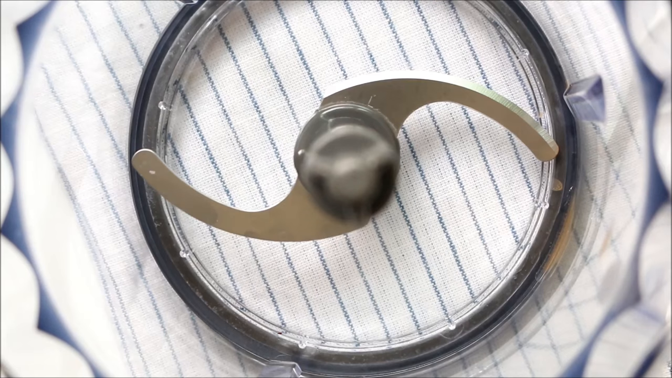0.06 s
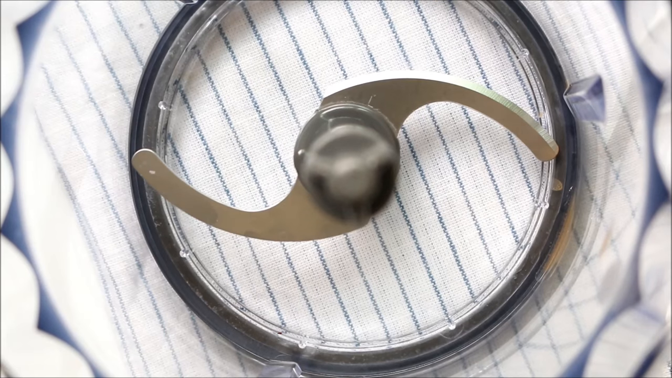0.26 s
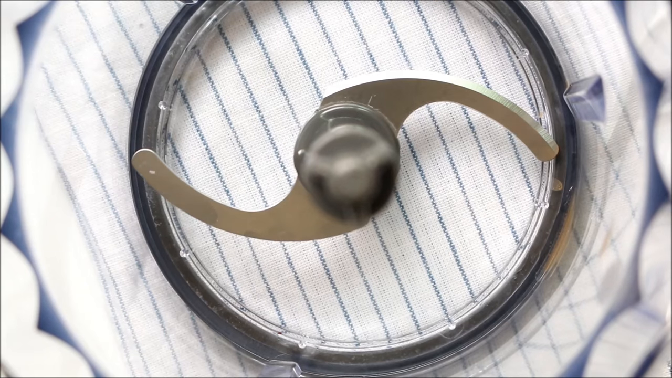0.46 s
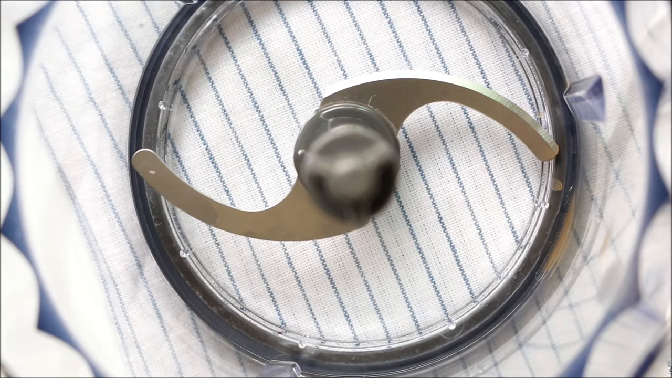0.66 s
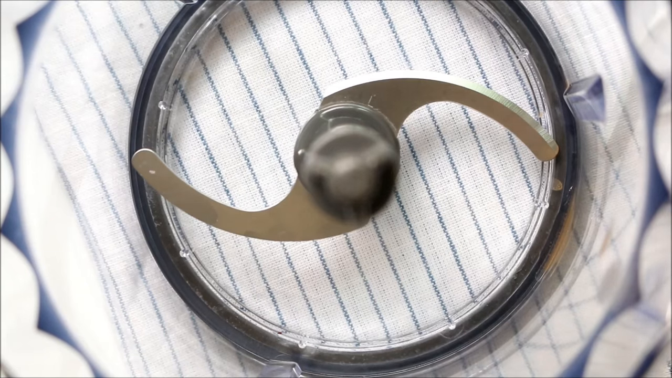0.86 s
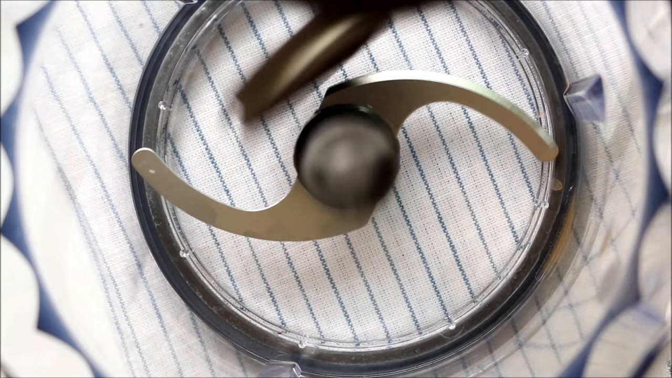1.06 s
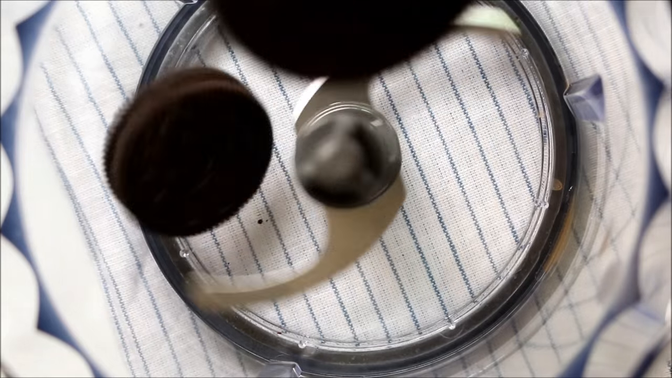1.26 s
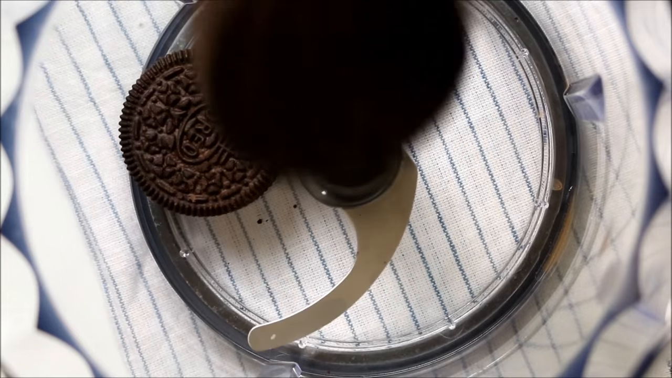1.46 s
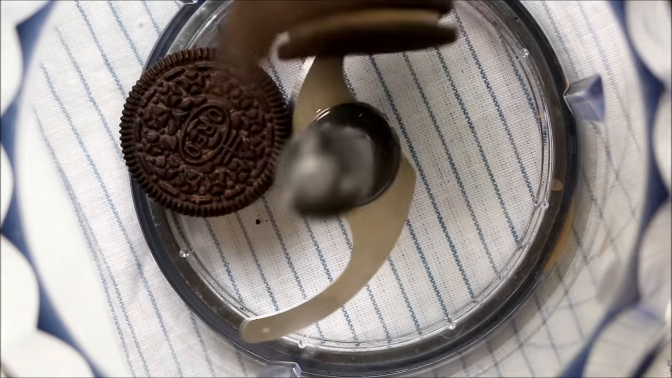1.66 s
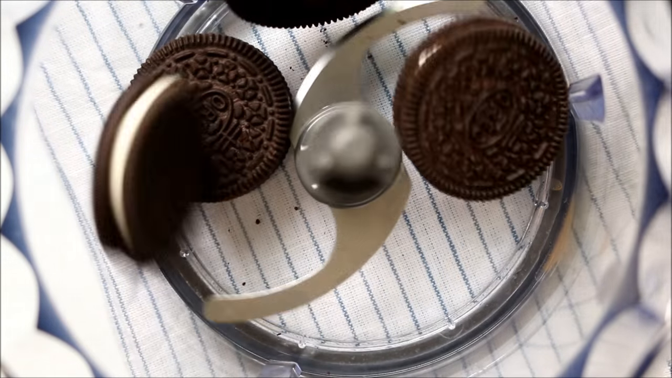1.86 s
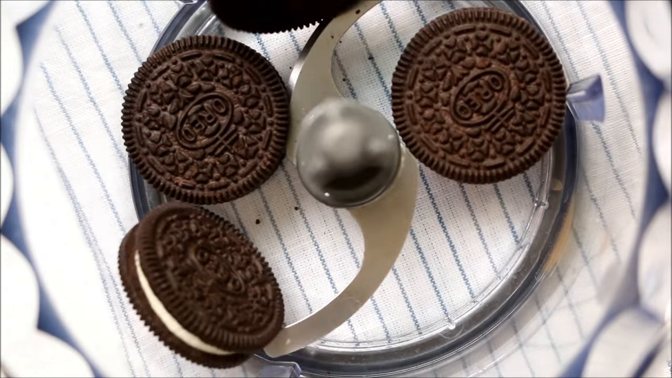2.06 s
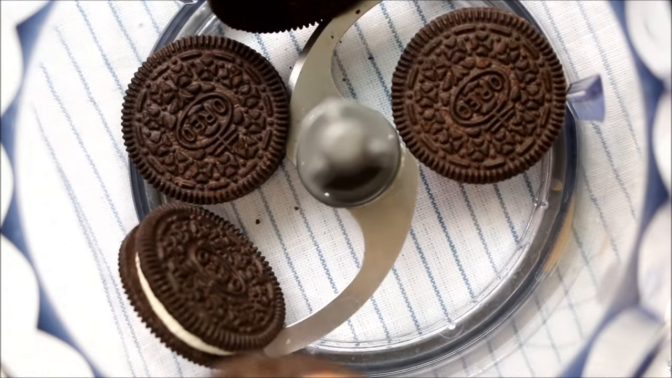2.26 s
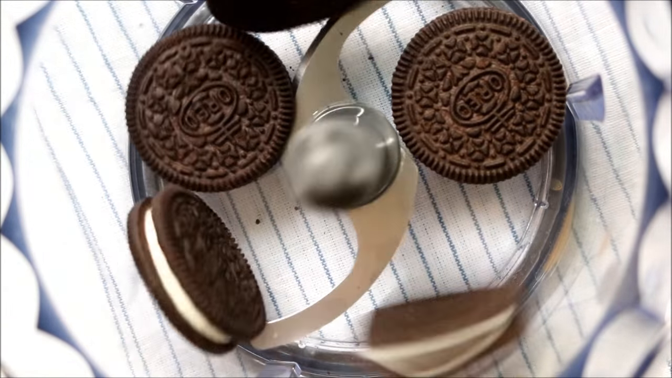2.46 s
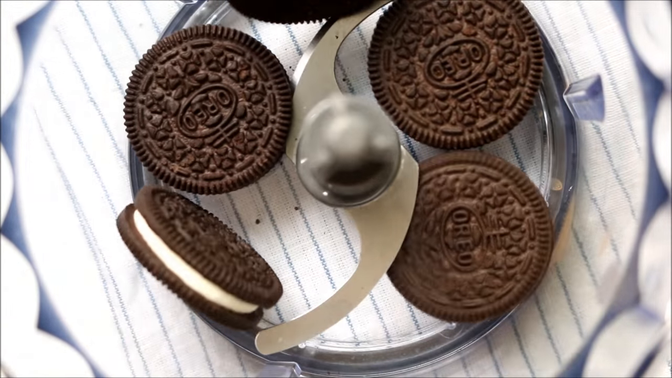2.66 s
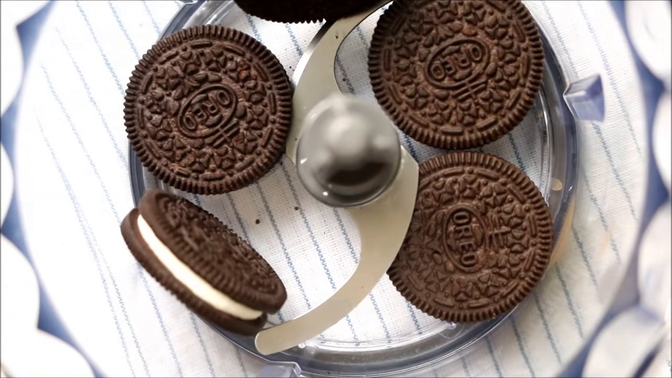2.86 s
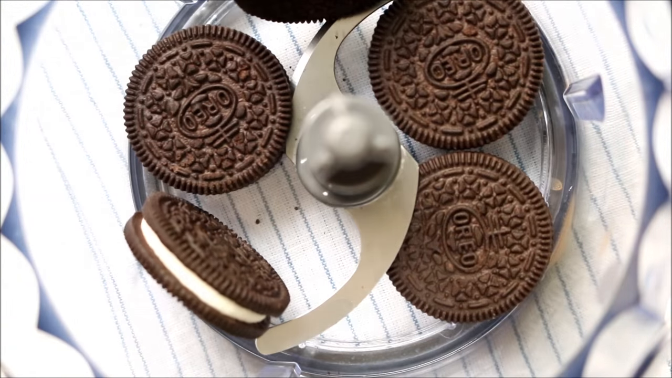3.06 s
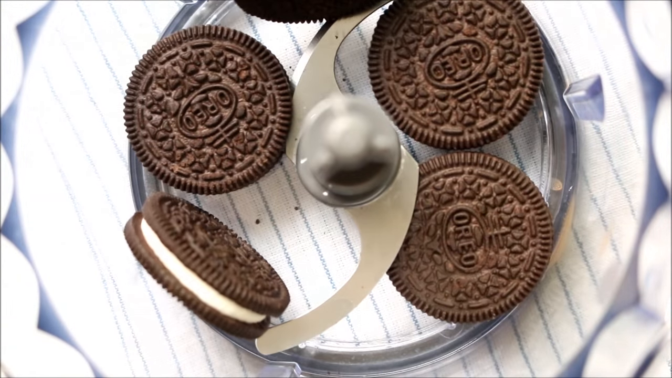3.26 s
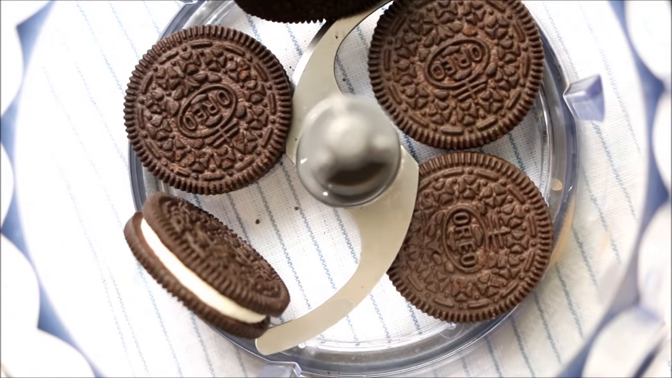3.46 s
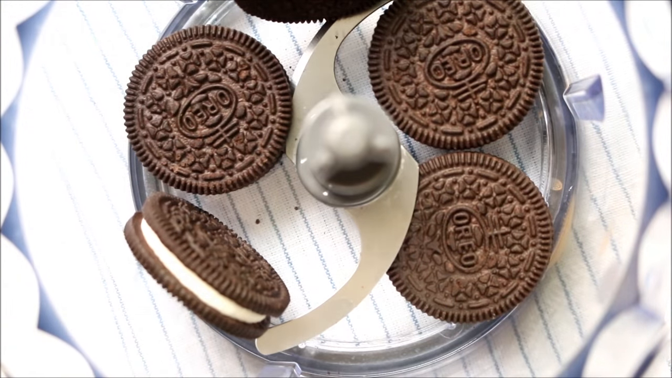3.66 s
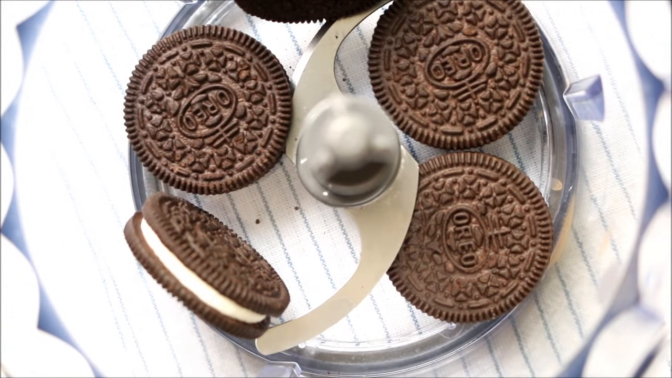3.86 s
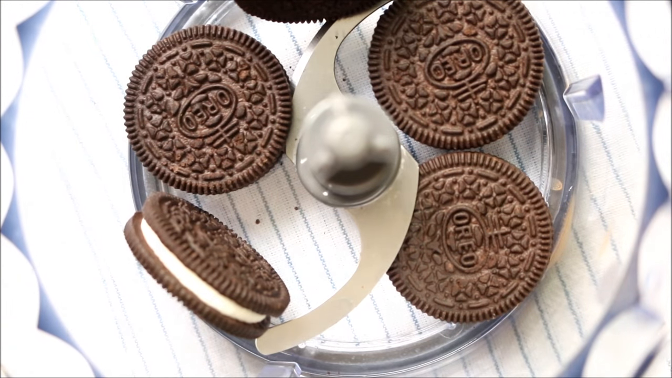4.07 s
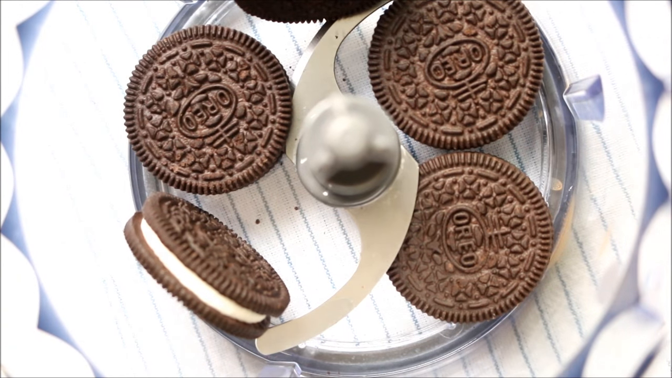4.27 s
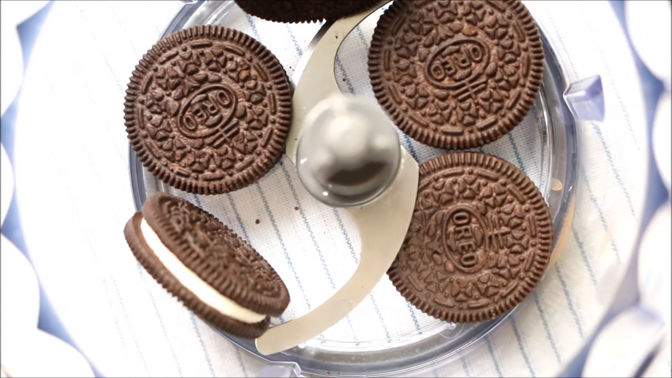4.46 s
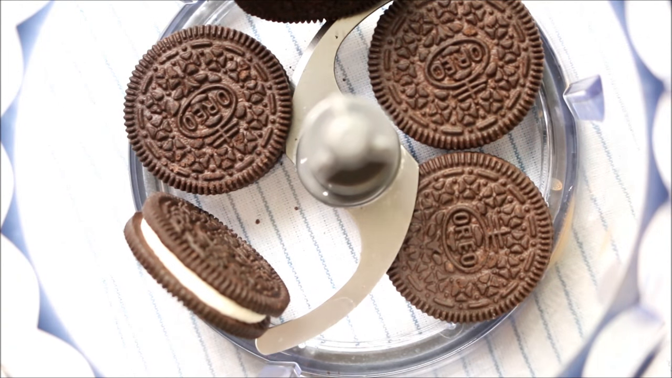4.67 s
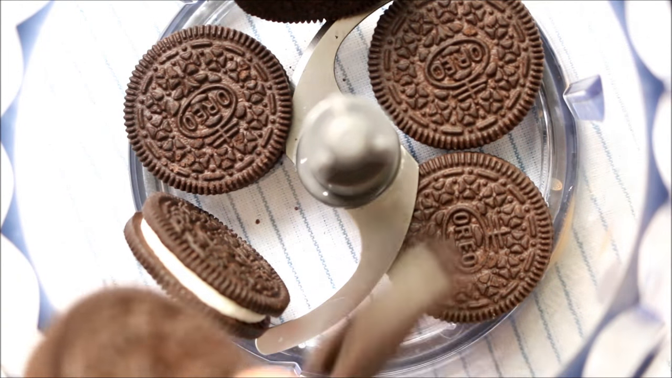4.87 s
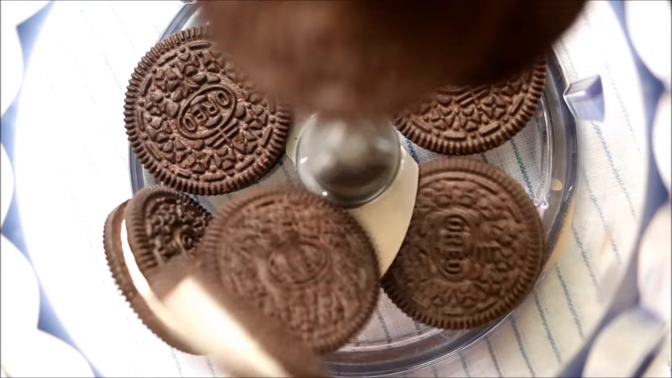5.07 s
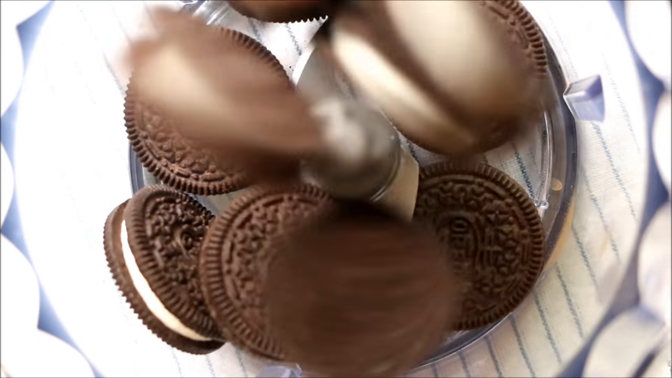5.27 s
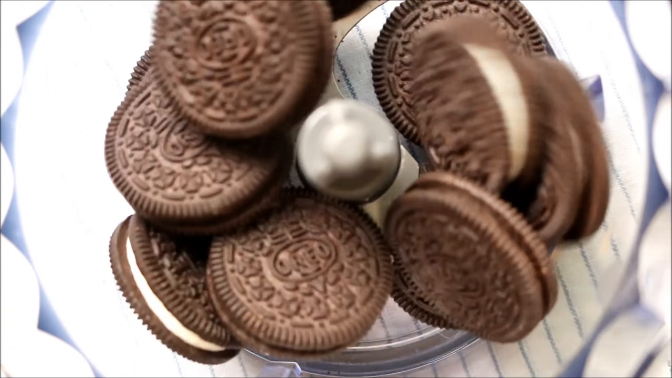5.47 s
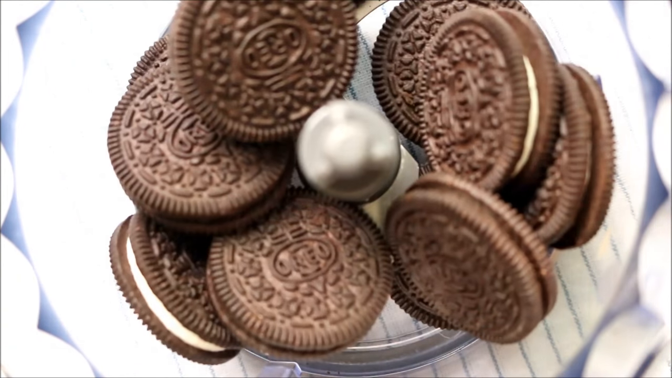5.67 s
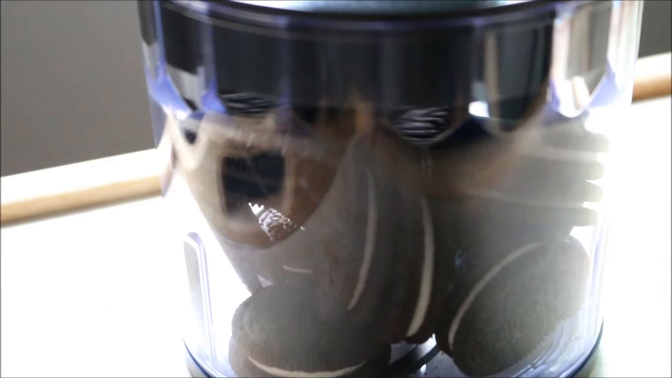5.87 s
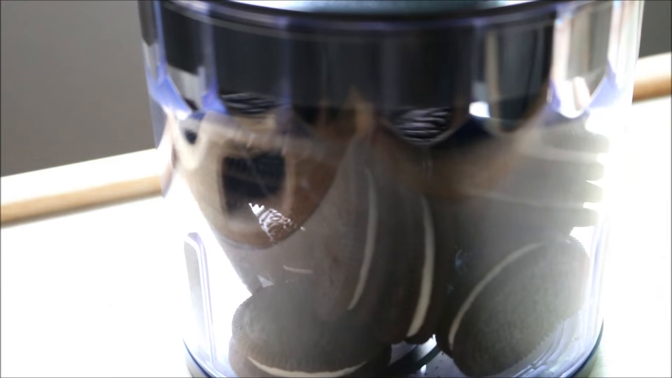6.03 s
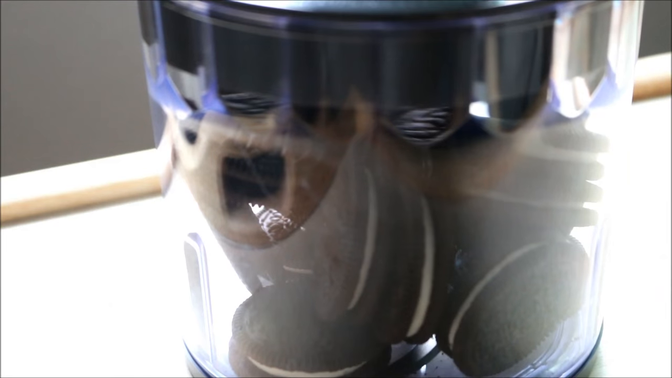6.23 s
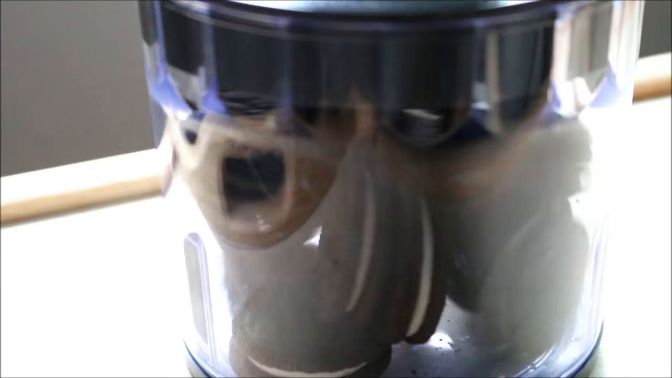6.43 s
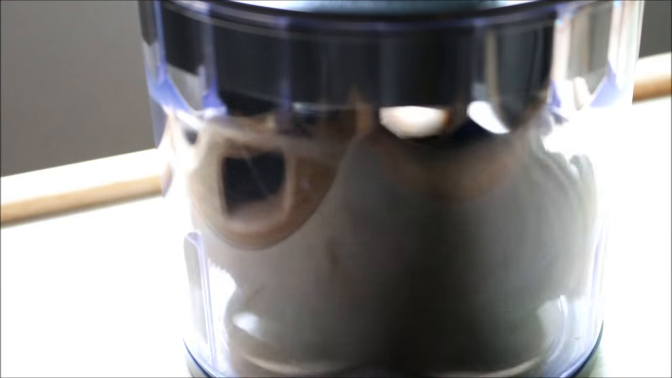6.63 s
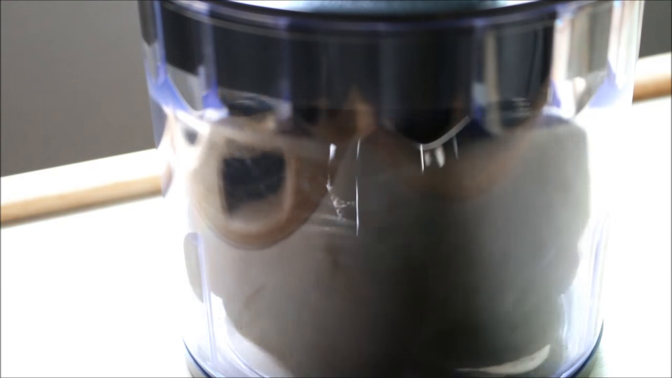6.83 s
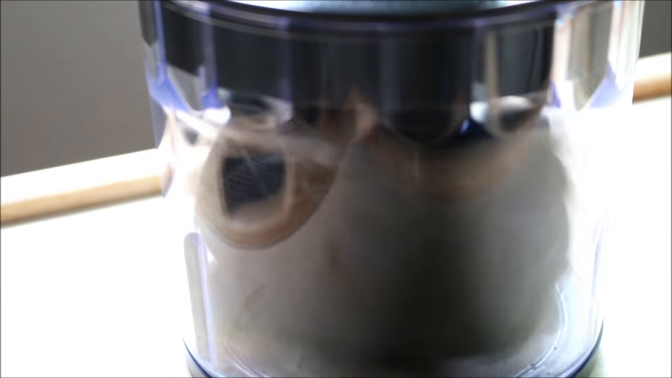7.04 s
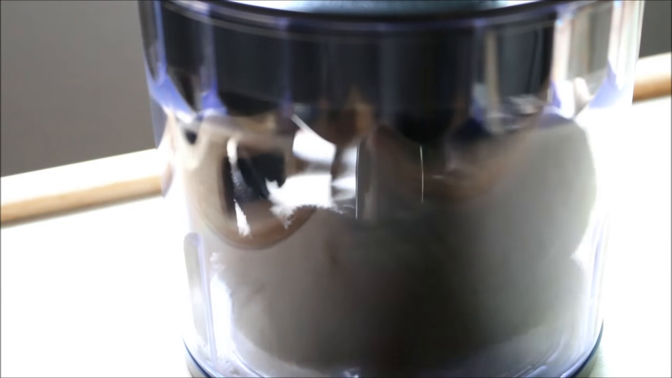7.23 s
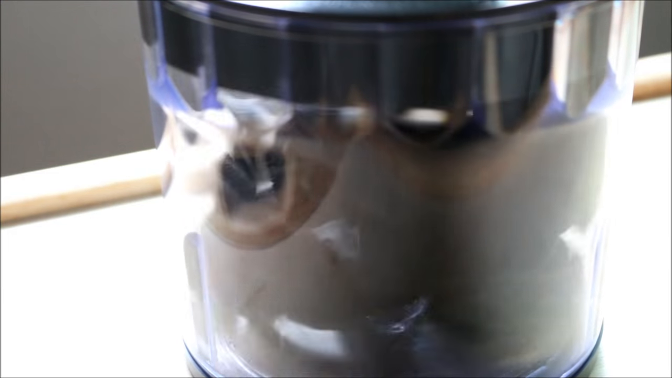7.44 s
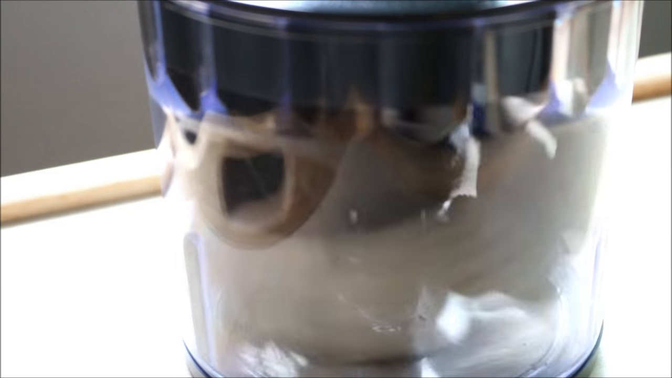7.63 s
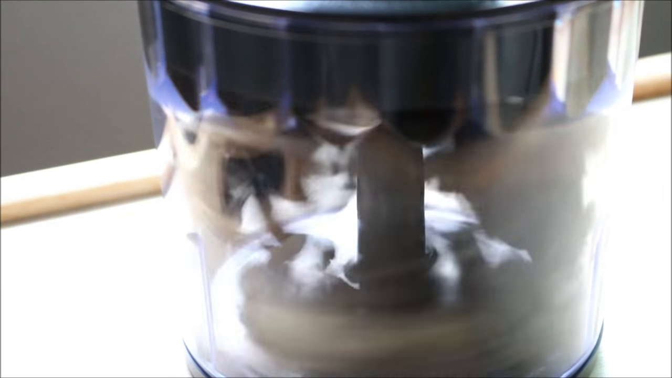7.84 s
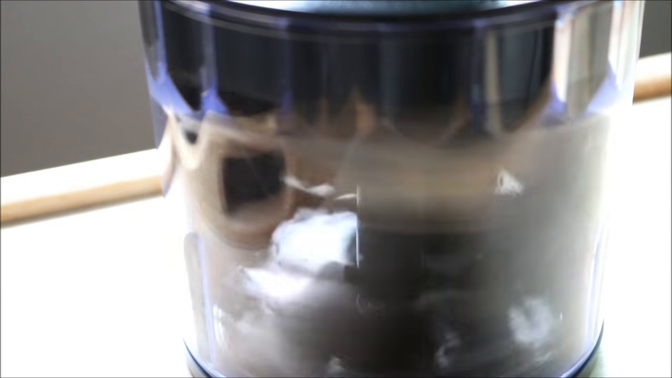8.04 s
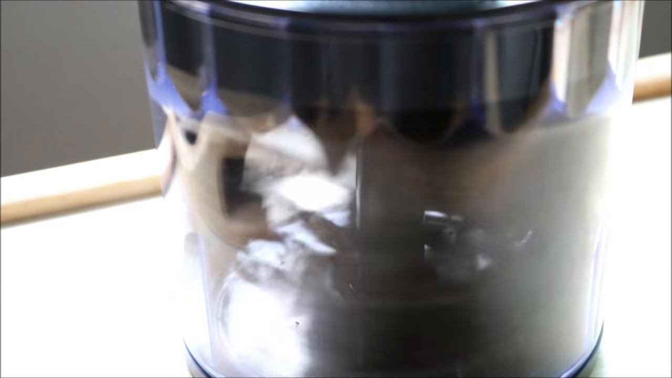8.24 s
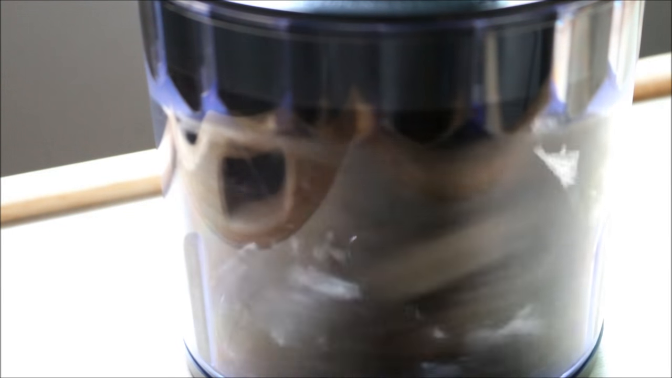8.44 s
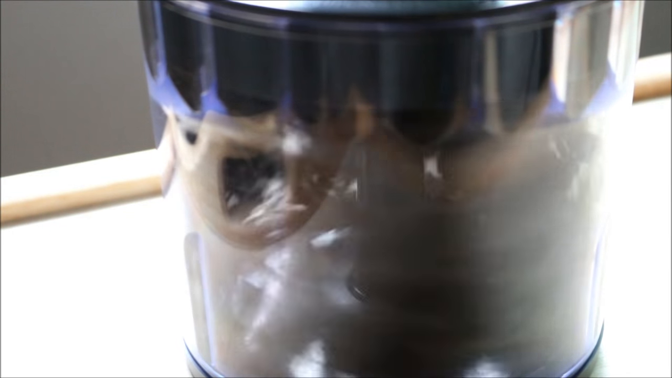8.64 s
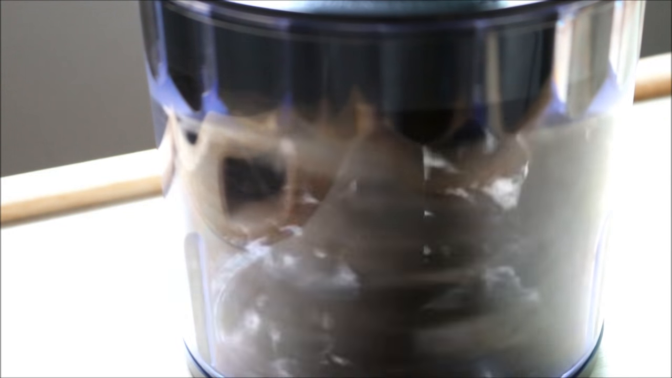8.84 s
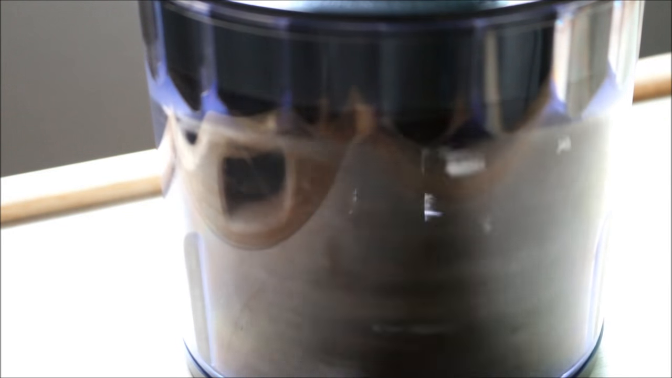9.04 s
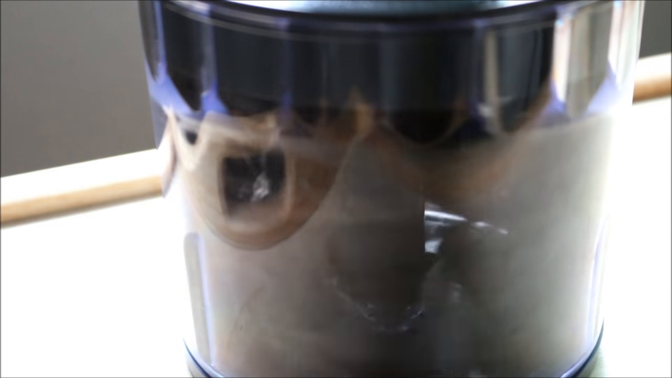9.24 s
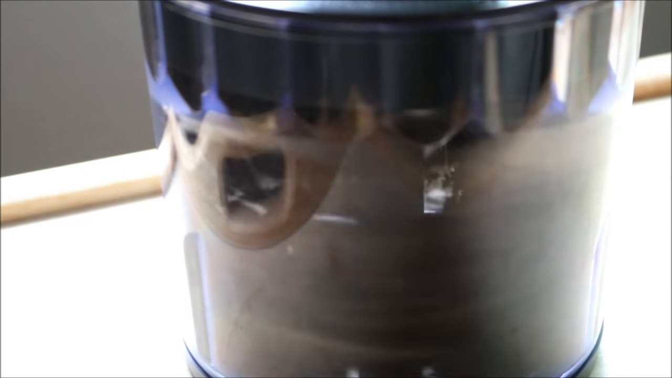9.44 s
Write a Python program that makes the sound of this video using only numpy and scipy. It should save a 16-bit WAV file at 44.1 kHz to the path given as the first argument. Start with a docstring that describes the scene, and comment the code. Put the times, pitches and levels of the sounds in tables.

```python
"""A faint hiss and low rumble, then cookies knocking into a chopper's plastic bowl in flurries.
Between them a packet is shuffled nearby; after a brief near-silent dip, pieces rattle in the chopper,
coarse at first, then finer. Blows are modal synthesis: noisy contacts excite dying sines and splintery
noise. Packet, tumbling, chunks and crumbs are granular noise; hiss and rumble are filtered noise.
A close microphone hears them with faint kitchen echoes."""
import sys
import numpy as np
from scipy import signal
from scipy.fft import rfft, irfft
from scipy.io import wavfile
from scipy.ndimage import uniform_filter1d

SR = 44100
rng = np.random.default_rng(int(sys.argv[2]) if len(sys.argv) > 2 else 0)


def to_linear_factor(level_db):
    """Convert decibel levels (scalar or array-like) to linear amplitude factors."""
    exponent = np.asarray(level_db, float) / 20
    return 10 ** exponent


def transcribe(u):
    """Save the signal u as a 16-bit wav file named by the first command-line argument.

    u: samples, shape (n,) or (channels, n), limited to [-1, 1]; the rate is SR.
    q: integer samples, one column per channel.
    """
    v = np.clip(np.atleast_2d(u).T, -1, 1)
    q = np.round(v * 32767).astype(np.int16)
    wavfile.write(sys.argv[1], SR, q)


N = 418950
T = np.arange(N) / SR  # seconds


def evened(x):
    """Normalization: scales a signal to rms 1."""
    return x / np.sqrt(np.mean(x ** 2) + 1e-20)


def read(points, hz):
    """Log-frequency interpolation: reads a curve given at a few frequencies."""
    f, value = np.transpose(points)
    return np.interp(np.log(hz + 1), np.log(f + 1), value)


def colour(tone):
    """Minimum phase: causal filter taps with the given spectrum, so that clicks keep a sharp front."""
    hz = abs(np.fft.fftfreq(4096, 1 / SR))
    log_gain = np.log(to_linear_factor(read(tone, hz)) + 1e-5)
    spectrum = np.exp(np.conj(signal.hilbert(log_gain)))
    return np.fft.ifft(spectrum).real[:2048]


def coloured(x, tone):
    """Linear filtering: gives a signal the spectrum's colour, at rms 1."""
    return evened(signal.oaconvolve(x, colour(tone))[:N])


def fading(db_per_s, since_s):
    """Exponential decay: a gain falling steadily in dB for up to a second once since_s is positive."""
    return to_linear_factor(-db_per_s * np.clip(since_s, 0, 1))


def grains(per_s, spread_db, length_s):
    """Shot noise: random short puffs whose sizes spread exponentially in dB, at rms 1."""
    size = to_linear_factor(spread_db * np.minimum(rng.exponential(1, N), 4))
    starts = rng.random(N) < per_s / SR
    puff = np.exp(-np.arange(2000) / SR / length_s)
    envelope = signal.oaconvolve(size * starts, puff)[:N]
    return evened(envelope * rng.standard_normal(N))


def add(mix, s, sound):
    """Superposition: mixes a sound in at s seconds."""
    part = mix[round(s * SR):][:len(sound)]
    part += sound[:len(part)]


def ring(modes, scatter_db=0, detune=0, size=5000):
    """Modal response: a sum of dying sines; where the blow lands sets how strongly each mode speaks."""
    hz, db, t60 = np.transpose(modes)[:, :, None]
    t = np.arange(size) / SR
    luck = rng.standard_normal((2, len(modes), 1))
    strength = to_linear_factor(db + scatter_db * luck[0] - 60 * t / t60)
    return (strength * np.sin(2 * np.pi * hz * (1 + detune * luck[1]) * t)).sum(0)


# Room hiss spectrum. Each row: frequency in Hz, relative density in dB per Hz.
HISS_TONE = [(25, -6.5), (70, 9), (2720, -8.5), (12200, -14), (16000, -16.5)]
DIP_S = (5.912, 5.975)  # near-silence from, to; the hiss is quieter after it
HISS_DB, HISS_AFTER_DB = -58.5, -65.5
HISS_SURGE_DB, HISS_SETTLE_S = 4.5, 0.066  # surge at the start and again after the dip


def hiss():
    """Stationary filtered noise: room hiss, surging briefly at the start and after the dip."""
    after = T > DIP_S[1]
    since = T - after * DIP_S[1]
    db = np.where(after, HISS_AFTER_DB, HISS_DB) + HISS_SURGE_DB * np.exp(-since / HISS_SETTLE_S)
    return coloured(rng.standard_normal(N), HISS_TONE) * to_linear_factor(db)


# How strongly the counter is shaken. Each row: time in seconds, level in dB.
SHAKING = [(0, -58), (1.0, -79), (1.3, -48.5), (5.35, -56.5), (5.55, -40.5), (5.9, -51), (5.98, -92),
           (6.6, -61.5)]
COUNTER_HZ = 52.5  # its lowest mode


def counter():
    """Forced resonance: footfall and appliance rumble keep a low mode swelling and fading."""
    shaking_db = np.interp(T, *np.transpose(SHAKING))
    narrow = signal.lfilter(*signal.iirpeak(COUNTER_HZ, 4., SR), rng.standard_normal(N))
    narrow = evened(signal.lfilter(*signal.iirpeak(COUNTER_HZ, 3., SR), narrow))
    return to_linear_factor(shaking_db) * narrow


# Packet bumped along the counter. Each row: time in seconds, relative strength in dB.
SHUFFLE = [(3.074, -30.5), (3.171, -27), (3.32, -17.5), (3.546, -21), (3.599, -28), (3.746, -30),
           (3.821, -25), (3.928, -30), (4.033, -25), (4.087, -29.5), (4.14, -41.5)]
# Spectrum of the dull bumps. Each row: frequency in Hz, relative density in dB per Hz.
SHUFFLE_TONE = [(100, -12), (210, 6.5), (330, -4), (580, 3.5), (1150, -7), (1500, -15), (15000, -32.5)]
# Faint ringing nearby. Each row: frequency in Hz, level over bump strength in dB, t60 in seconds.
PACKET = [(1066, -23, .5), (2780, -27, .07)]
# One thin high ring nearby. Each row: frequency in Hz, level in dB, t60 in seconds.
PING = [(1916, -57, .45)]
PING_S = 3.6
# Fingers brushing the wrapper. Each row: loudest moment in seconds, level in dB, swell in dB per second.
BRUSHES = [(0.971, -45, 203.5), (4.206, -51.5, 900), (4.644, -54, 398), (4.775, -43, 308)]
# Spectrum of the brushes. Each row: frequency in Hz, relative density in dB per Hz.
BRUSH_TONE = [(590, -43), (1000, -4), (7100, 2), (16000, -2.5)]
BRUSH_FADE_DB_PER_S = 491


def packet():
    """Granular friction: dull grainy bumps leave a faint ring; brushes of the wrapper are brighter."""
    push, ringing = np.zeros((2, N))
    for s, strength_db in SHUFFLE:
        add(push, s, to_linear_factor(strength_db) * np.exp(-np.arange(SR // 4) / SR / 0.062))
        add(ringing, s, to_linear_factor(strength_db) * ring(PACKET, scatter_db=3.5, size=16000))
    add(ringing, PING_S, ring(PING, size=SR))
    bumps = grains(per_s=690, spread_db=-10.0, length_s=0.0085) * push
    dull = coloured(bumps, SHUFFLE_TONE)
    stroke = np.zeros(N)
    for s, db, swell in BRUSHES:
        stroke += to_linear_factor(db) * fading(swell, s - T) * fading(BRUSH_FADE_DB_PER_S, T - s)
    brush = coloured(grains(per_s=1300, spread_db=3, length_s=0.0029), BRUSH_TONE) * stroke
    return 0.24 * dull * np.std(push) + ringing + brush


# Bowl modes of the hollow knock. Each row: frequency in Hz, relative level in dB, t60 in seconds.
KNOCK = [(209.5, -8.5, 0.08), (647.3, 8.5, 0.039), (774, -0.5, 0.053)]
# Modes of the wall clack. Each row: frequency in Hz, relative level in dB, t60 in seconds.
CLACK = [(1150, 6, 0.025), (1690, 15.5, 0.0062)]
# Modes of the wall ring. Each row: frequency in Hz, relative level in dB, t60 in seconds.
WALL_RING = [(2294, 9.5, 0.017), (2540, -3, 0.016)]
# Broad splinter noise. Each row: frequency in Hz, relative density in dB per Hz.
CRACK = [(2600, -12), (3700, 11), (5000, 10), (8000, -0.5), (12000, -2), (16000, -10)]


def blow(knock_db, clack_db, crack_db, ring_db, chatter_s):
    """Impact excitation: a crumbly contact with quick rebounds rings bowl modes and splinters off treble."""
    t, luck = np.arange(1200) / SR, rng.random((2, 3, 1))  # luck: strength and delay of three rebounds
    softness = np.clip((knock_db - crack_db - 17.5) / 14, .1, 1.5)  # dull blows build up slower

    def touch(u):
        """Contact envelope: a soft rise, then exponential decay."""
        rise = -np.expm1(-abs(u) / (0.0012 * softness))
        return (u >= 0) * rise * np.exp(-abs(u) / (chatter_s * (1.0 + softness)))

    rebounds = (0.37 * luck[0] ** 2 * touch(t - .012 * luck[1])).sum(0)
    contact = rng.standard_normal((2, len(t))) * (touch(t) + rebounds)
    landings = np.zeros(len(t))
    landings[(.012 * SR * luck[1, :, 0]).astype(int)] = 0.66 * luck[0, :, 0] ** 2
    landings[0] = 1
    hollow = ring(KNOCK, scatter_db=2.5, detune=.02)
    hollow *= -np.expm1(-np.arange(len(hollow)) / SR / (0.0022 * softness ** 2))
    uneven = [(hz, db + 3 * rng.standard_normal()) for hz, db in CRACK]
    knock = signal.fftconvolve(landings, hollow)
    edge = np.convolve(contact[0], np.hanning(9))  # smoothed contact drives the wall
    clack = signal.fftconvolve(edge, ring(CLACK, scatter_db=11.0, detune=0.12))
    wall = signal.fftconvolve(edge, ring(WALL_RING, scatter_db=7.0, detune=0.044))
    crack = signal.fftconvolve(contact[1], colour(uneven))
    out = to_linear_factor(knock_db) * knock / abs(knock).max()
    for db, part in ((clack_db, clack), (ring_db, wall), (crack_db, crack)):
        add(out, 0, to_linear_factor(db) * part / np.std(part[:280]))  # level set by the onset
    return out


# Cookie blows on bowl and blade. Each row: time in seconds, hollow knock peak in dB,
# sharpness (crack over knock) in dB, wall ring over knock in dB.
BLOWS = [(1.098, -5, -6.5, -13), (1.108, -25, 0.5, -0.5), (1.18, -11.5, -24.5, -12.5),
         (1.31, -26, 4.5, -10.5), (1.364, -18, -18.5, -14), (1.375, -12.5, -15, -19.5),
         (1.396, -22, -12.5, -8.5), (1.401, -12.5, -9, -2), (1.45, -9, -21, -21.5), (1.516, -27.5, -4, -12),
         (1.538, -4.5, -21.5, -29), (1.577, -14, -28, -18.5), (1.642, -11, -2.5, -1),
         (1.725, -15, -10, -14), (1.76, -12, -23.5, -13), (1.792, -19, -17.5, -19),
         (1.816, -14.5, -12.5, -12), (1.859, -12.5, -14, -6.5), (1.942, -29, 1.5, -2),
         (1.978, -21, -14.5, -14), (1.964, -18, -17.5, -19), (2.003, -10.5, -21, -13.5),
         (2.043, -18.5, -15.5, -4), (2.068, -23.5, -16.5, -12.5), (2.265, -35.5, -8.5, -4),
         (2.455, -7, -17, -13.5), (2.472, -17, -9, -4.5), (2.527, -18.5, -8.5, -12.5),
         (2.532, -10, -15.5, -3), (2.561, -17, -14.5, -14), (2.588, -11, -18.5, -28), (2.626, -20, -16, -7),
         (2.661, -17, -14, -7.5), (2.669, -10, -17.5, -13), (2.708, -16, -18, -3), (2.963, -42.5, -17, -5),
         (4.927, -4.5, -14.5, -16.5), (4.947, -17, -32, -17), (4.961, -20, -18.5, -14),
         (4.981, -24, -14, -9.5), (4.995, -10.5, -32.5, -18), (5.036, -22.5, -8.5, -6),
         (5.043, -13.5, -19.5, -9.5), (5.077, -13, -16.5, 3.5), (5.117, -19.5, -11.5, -4.5),
         (5.231, -23.5, -2, -8.5), (5.265, -4, -23, -26.5), (5.281, -21, -10.5, -10),
         (5.306, -17.5, -17.5, -16.5), (5.325, -11, -16, -16), (5.332, -24, 4, -8),
         (5.345, -3.5, -22.5, -20.5), (5.372, -26.5, -5.5, -6.5), (5.421, -9, -20.5, -16.5),
         (5.474, -23.5, -20.5, -3.5), (5.978, -46, -2, 3.5)]
# Runs of regular taps: a cookie bouncing quickly, then one rocking on its rim. Each row: start in seconds,
# period in seconds, number of taps.
TAP_RUNS = [(2.085, .0155, 5), (2.249, .0567, 4)]
# First tap of each run. Each entry: knock peak in dB.
TAP_RUN_DB = (-30, -36.5)
# Cookies tumbling over each other. Each row: start in seconds, length in seconds, level in dB.
TUMBLES = [(1.13, 0.3, -40), (1.695, 0.42, -31), (2.462, 0.21, -35.5), (4.937, .24, -39.5),
           (5.27, 0.28, -38)]
# Thin lingering tones of bowl and blade. Each row: frequency in Hz, relative level in dB.
LINGER = [(186, -57.5), (632, -65), (1739, -56.5), (2290, -62.5), (4590, -60.5)]
LINGER_T60_S = .25
CLACK_DB, CLACK_PER_SHARP = -6, 0.25  # the wall clack over the knock grows with sharpness
TAP_RUN_FADE_DB, TAP_RUN_SHARP_DB = -3, -6  # change per tap; crack over knock
SETTLE_DB_PER_S = 188.5  # how fast tumbling dies


def cookies():
    """Impacts and dense rolling: single blows and runs of bounces or rocking over tumbling; thin modes linger."""
    out = np.zeros(N)
    for s, db, sharp_db, ring_db in BLOWS:
        clack_db = db + CLACK_DB + CLACK_PER_SHARP * sharp_db
        add(out, s, blow(db, clack_db, db + sharp_db, db + ring_db, chatter_s=0.0016))
    for (s, period, count), first_db in zip(TAP_RUNS, TAP_RUN_DB):
        for k in range(count):
            db = first_db + k * TAP_RUN_FADE_DB
            add(out, s + k * period, blow(db, db - 9, db + TAP_RUN_SHARP_DB, db + 0.5, chatter_s=0.00042))
    taps = grains(per_s=340, spread_db=2.0, length_s=0.0024)
    voices = [ring(KNOCK + CLACK + WALL_RING, scatter_db=5, detune=.12) for k in range(6)]
    # where on the bowl the taps land just now
    spot = rng.integers(len(voices), size=N)[np.arange(N) // 400]
    rolling = sum(signal.oaconvolve(taps * (spot == k), voice)[:N] for k, voice in enumerate(voices))
    tumbling = np.zeros(N)
    for s, length, db in TUMBLES:
        tumbling += (T >= s) * to_linear_factor(db) * fading(SETTLE_DB_PER_S, T - s - length)
    out += (evened(rolling) + to_linear_factor(-11.0) * coloured(taps, CRACK)) * tumbling
    lingering = ring([(*mode, LINGER_T60_S) for mode in LINGER], size=16000)
    return out + signal.oaconvolve(out, lingering)[:N]


# Spectrum of tumbling chunks. Each row: frequency in Hz, relative density in dB per Hz.
CHUNK_TONE = [(120, -58.5), (194, 0), (340, 3), (675, 0.5), (1360, -2.5), (2500, -17), (3250, -46)]
# Chopper body modes. Each row: frequency in Hz, relative level in dB, t60 in seconds.
HOUSING = [(237.6, 6.5, 0.48), (529, 14.5, 0.11)]
# Spectrum of flying crumbs. Each row: frequency in Hz, relative density in dB per Hz.
CRUMB_TONE = [(880, -32), (1500, -2.5), (5600, 0.5), (6700, -6), (12500, -2.5), (15800, -14)]
# Spectrum of chunks on the wall. Each row: frequency in Hz, relative density in dB per Hz.
WALL_TONE = [(500, -16.5), (850, 15.5), (1400, 13), (4000, -2.5), (8000, -36)]
# Load surges or slumps; more or fewer crumbs fly. Each row: time in seconds, half length in seconds,
# crumb level change in dB.
SURGES = [(6.663, 0.034, 9), (6.913, 0.031, 5), (6.994, 0.057, -9.5)]
# Largest pieces the blade throws. Each row: time in seconds, knock peak in dB.
THROWN = [(6.4707, -43), (6.5027, -35), (6.7, -29.5), (6.731, -28), (6.83, -29), (6.852, -24.5),
          (7.0876, -29.5), (7.211, -28), (7.296, -30.5), (7.503, -30.5), (8.373, -31), (8.721, -31.5),
          (8.938, -33)]
MOTOR_ON_S, SPIN_UP_S, GROUND_S = 6.47, 0.2, (7.5, 7.91)  # chunks are ground down between these moments
# base level; change with coarseness; extra at low speed, here none
CHUNKS_DB, CHUNKS_COARSE_DB, CHUNKS_START_DB = -40, 2.5, 0
SPRAY_DB, SPRAY_START_DB, SPRAY_GROW_S = -37.5, -18.5, 0.37  # crumbs build up as cookies break


def chopper():
    """Granular collisions: chunks rumble, crumbs hiss in partly shared bursts; large pieces strike the bowl."""
    running = np.maximum(T - MOTOR_ON_S, 0)
    speed = np.minimum(running / SPIN_UP_S, 1)
    coarse = (0.56 + 0.5 * speed) * np.interp(T, GROUND_S, (0.97, 0.046))  # weight of big chunks
    surge_db = sum(db * np.maximum(1 - ((T - s) / half) ** 2, 0) for s, half, db in SURGES)
    chunks_db = CHUNKS_DB + CHUNKS_COARSE_DB * coarse + CHUNKS_START_DB * (1.5 - speed)
    tumble = (running > 0) * to_linear_factor(chunks_db + 0.34 * surge_db)
    spray_db = SPRAY_DB + SPRAY_START_DB * np.exp(-running / SPRAY_GROW_S)
    spray = (running > 0) * to_linear_factor(spray_db + surge_db)
    bursts = grains(per_s=200, spread_db=2.2, length_s=.003)
    chunks = .5 * bursts + 1.4 * grains(per_s=1700, spread_db=-5.5, length_s=0.0078)
    crumbs = 0.49 * bursts + 0.63 * grains(per_s=1400, spread_db=-3.0, length_s=0.0025)
    slosh = evened(uniform_filter1d(rng.standard_normal(N), 1500))
    crumbs *= to_linear_factor(2 * coarse * slosh)  # a coarse load sloshes in surges
    housing = evened(signal.oaconvolve(chunks, ring(HOUSING))[:N])
    body = coloured(chunks, CHUNK_TONE) + to_linear_factor(-12.5) * housing
    out = body * tumble + coloured(crumbs, CRUMB_TONE) * spray
    for hz in np.geomspace(3000, 13000, num=7):  # hard bits tick on the wall at seven pitches
        ticks = grains(per_s=14, spread_db=3, length_s=0.0024)
        tick = ring([(hz, 0, .004)], size=400)
        out += to_linear_factor(-20.5) * (tumble + spray) * evened(signal.oaconvolve(ticks, tick)[:N])
    knocks = grains(per_s=220, spread_db=4.0, length_s=0.0044)
    out += coarse * tumble * coloured(knocks, WALL_TONE)
    for s, db in THROWN:
        add(out, s, blow(db, db - 9.5, db - 6, db - 25, chatter_s=0.0015))
    return out


# Reverberation of the kitchen. Each row: frequency in Hz, t60 in seconds.
KITCHEN = [(100, 0.45), (700, 0.39), (2000, 0.36), (8000, 0.083)]


def kitchen(x):
    """Reverberation: sparse echoes of random sign, each band dying at its own speed."""
    taps = rng.choice([-1., 1.], SR) * (rng.random(SR) < .05) * (np.arange(SR) > 200)
    hz, t, z = signal.stft(taps, SR, nperseg=256)
    decay = to_linear_factor(-60 * t / read(KITCHEN, hz)[:, None])
    tail = signal.istft(z * decay, SR, nperseg=256)[1]
    return signal.fftconvolve(x, tail / np.linalg.norm(tail))[:N]


# Faint steady noise, opposite in sign left and right.
# Each row: frequency in Hz, relative density in dB per Hz.
SIDE_TONE = [(30, -5), (14800, -7.5), (16000, -14)]
SIDE_DB = -66  # rms in each channel


def scene():
    """Superposition: all sources at one microphone; the two channels differ only by faint noise."""
    highpass = signal.butter(4, 125, "high", fs=SR, output="sos")
    near = signal.sosfilt(highpass, cookies() + packet() + chopper())
    mix = near + to_linear_factor(-18) * kitchen(near) + counter() + hiss()
    side = to_linear_factor(SIDE_DB) * coloured(rng.standard_normal(N), SIDE_TONE)
    return np.array([mix + side, mix - side])


def roll_off(x):
    """The treble ends steeply here."""
    return signal.sosfilt(signal.butter(12, 15850, fs=SR, output="sos"), x)


# Narrow treble resonances of the microphone housing. Each row: frequency in Hz, lift in dB.
MIC_PEAKS = [(3800, 1.4), (4650, 2.7), (9400, 4), (11000, 4), (14450, 5)]
MIC_WIDTH_HZ = 300


def record(dry):
    """Resonance and overload: the microphone lifts treble bands, peaks clip, and a brief dip mutes all."""
    hz = np.fft.rfftfreq(N, 1 / SR)
    lift_db = sum(db / (1 + (2 * (hz - f) / MIC_WIDTH_HZ) ** 2) for f, db in MIC_PEAKS)
    heard = irfft(rfft(dry) * to_linear_factor(lift_db), N)
    clipped = np.clip(heard, -.9, .9)
    finished = clipped * np.where((T > DIP_S[0]) & (T < DIP_S[1]), to_linear_factor(-41), 1)
    return roll_off(finished)


dry = scene()
out = record(dry)
transcribe(out)
```